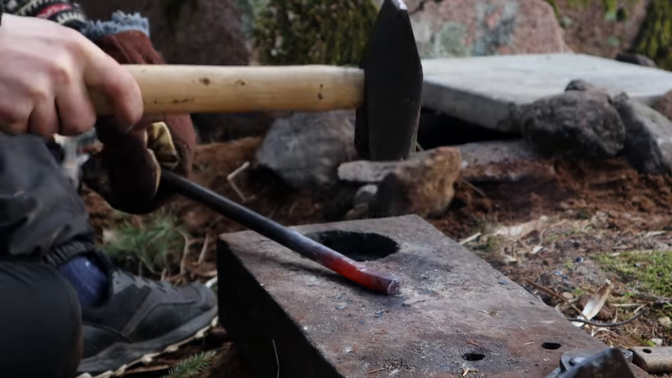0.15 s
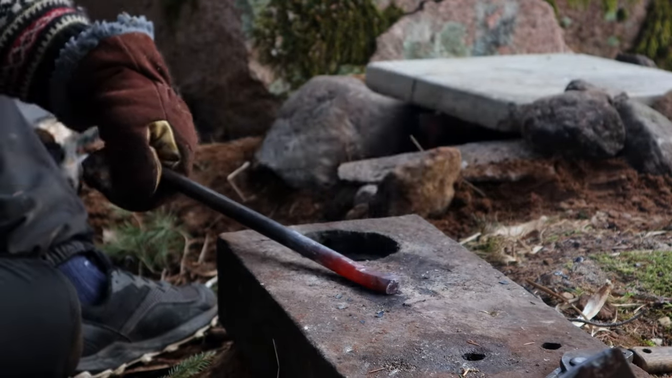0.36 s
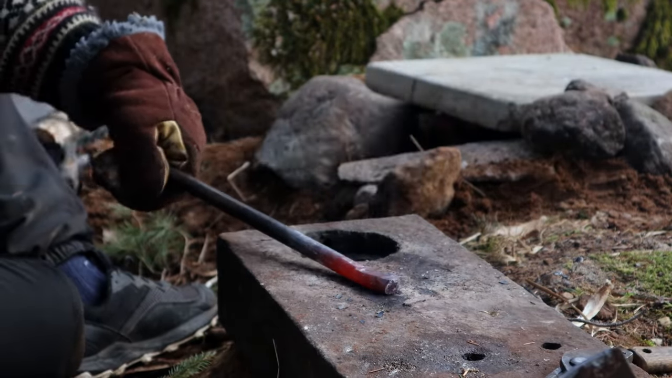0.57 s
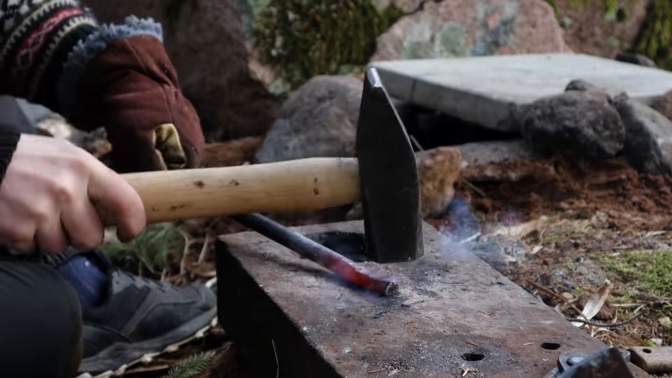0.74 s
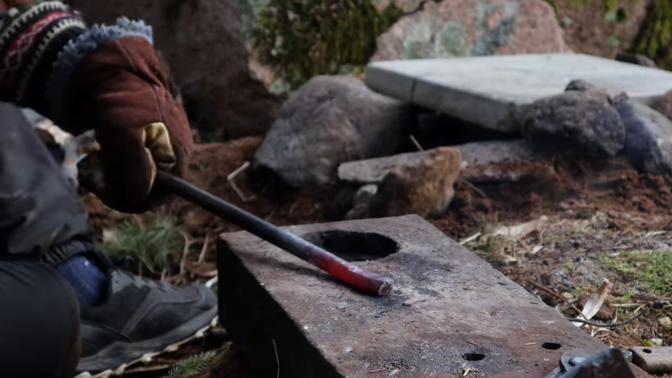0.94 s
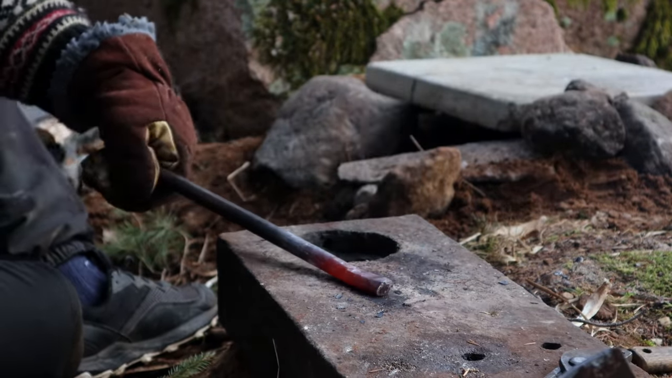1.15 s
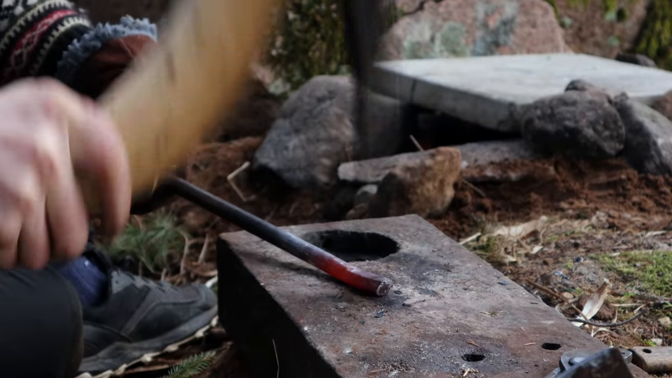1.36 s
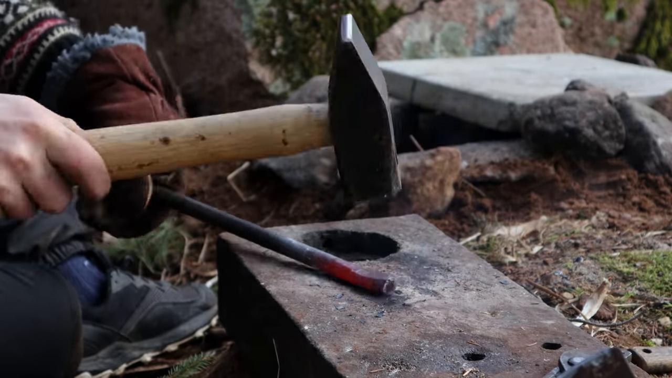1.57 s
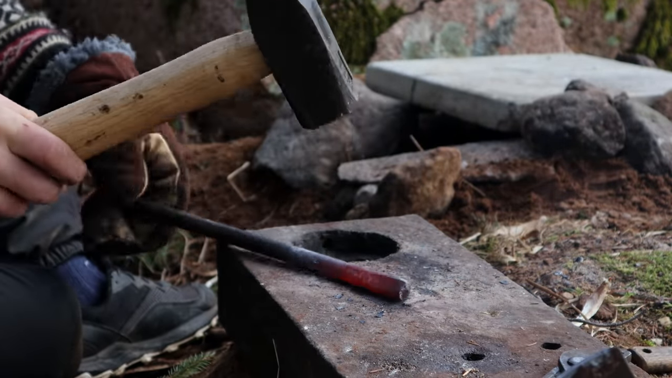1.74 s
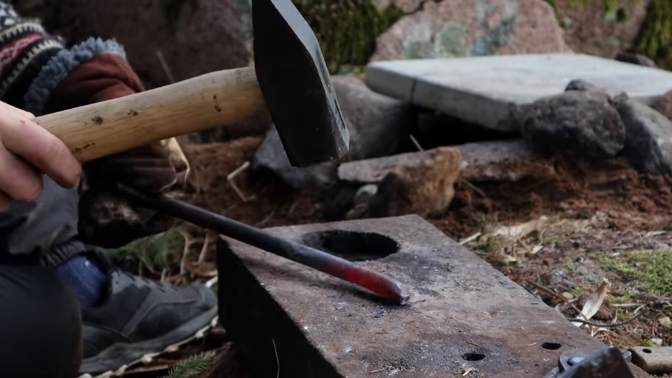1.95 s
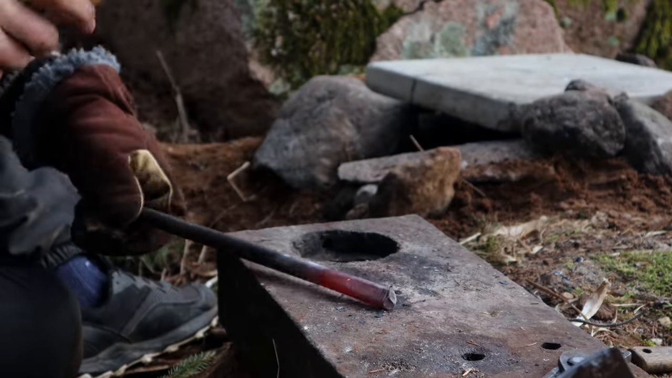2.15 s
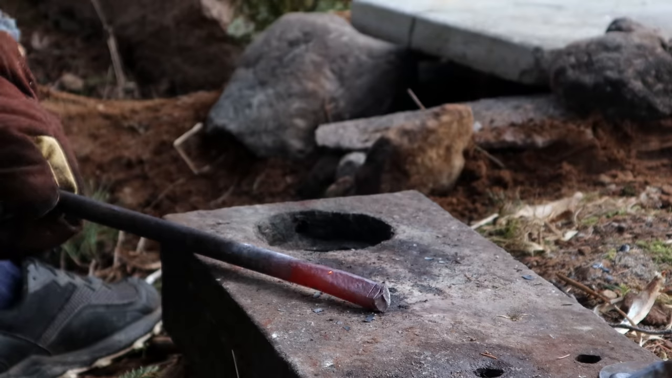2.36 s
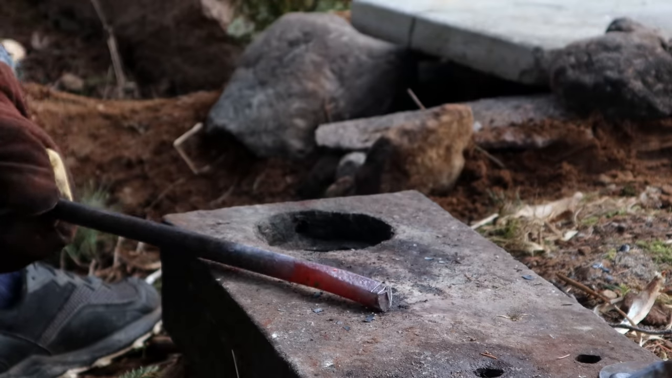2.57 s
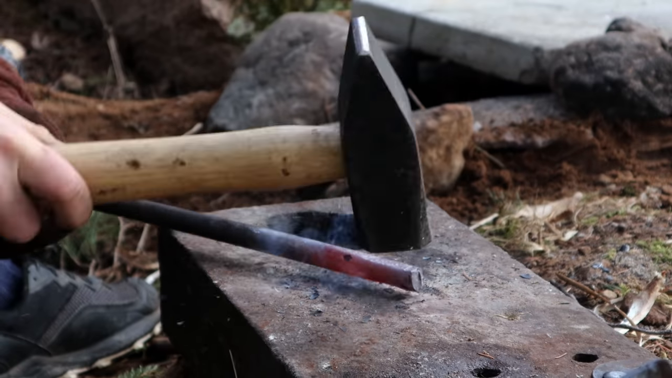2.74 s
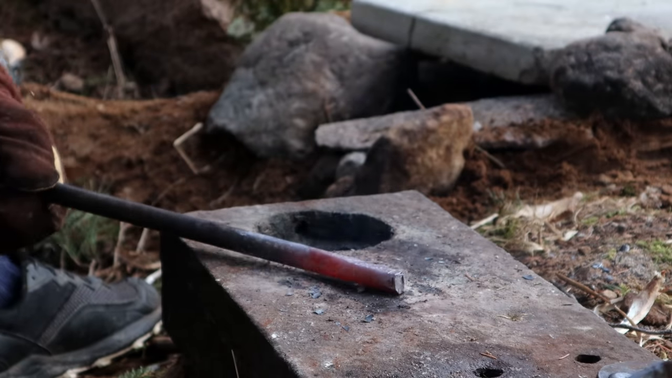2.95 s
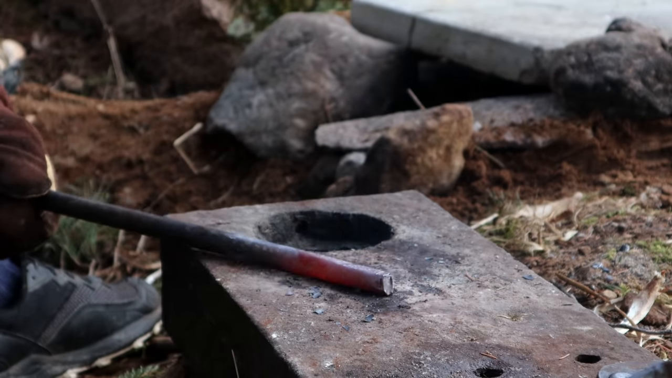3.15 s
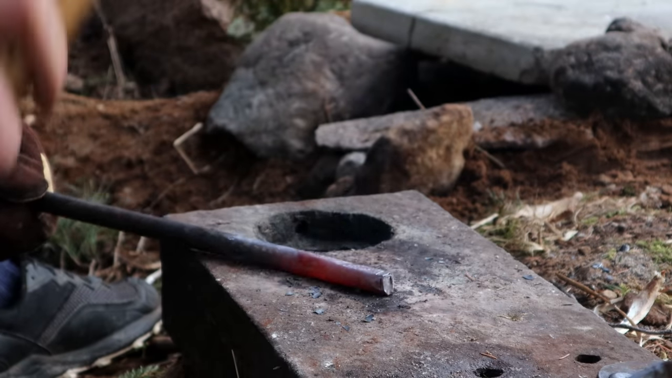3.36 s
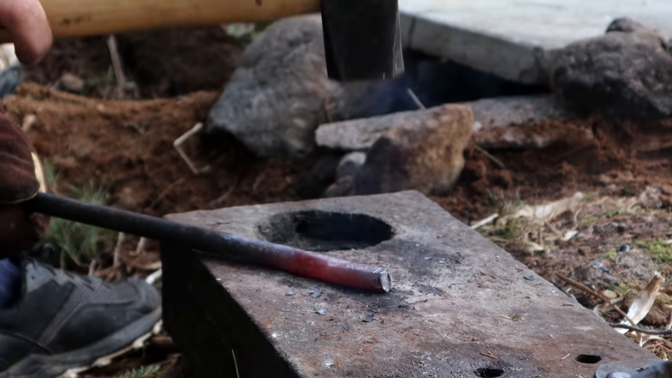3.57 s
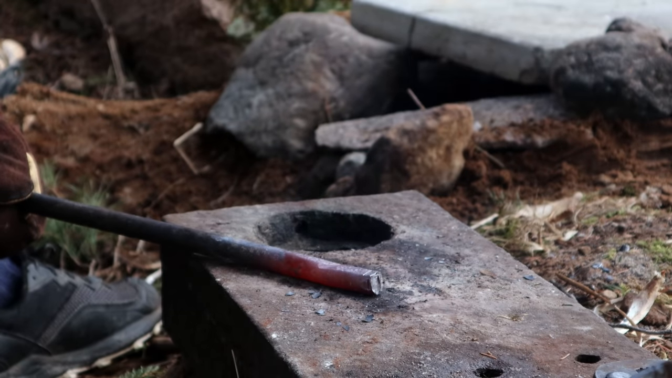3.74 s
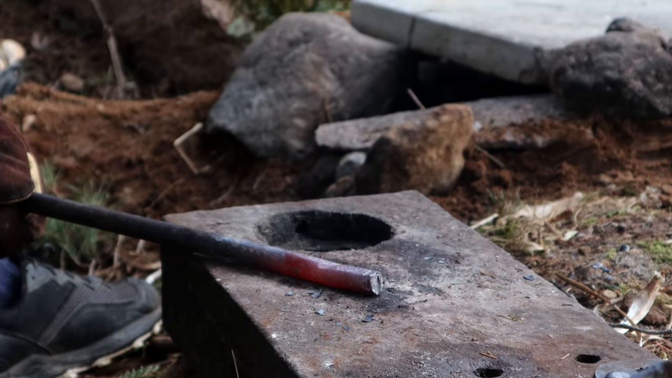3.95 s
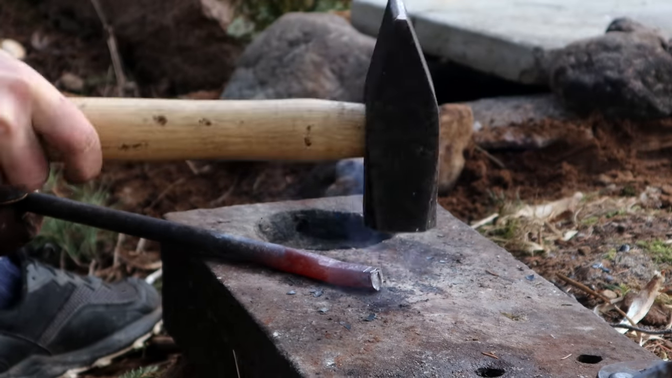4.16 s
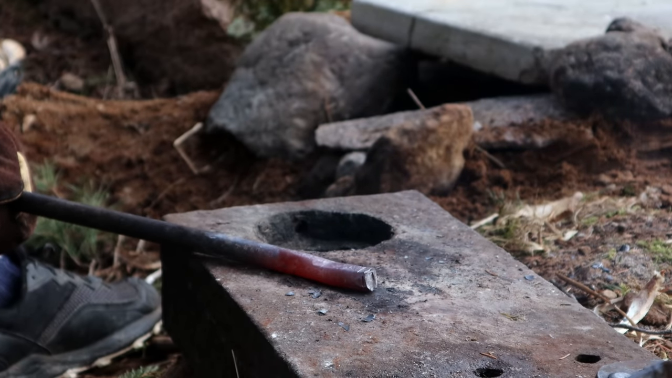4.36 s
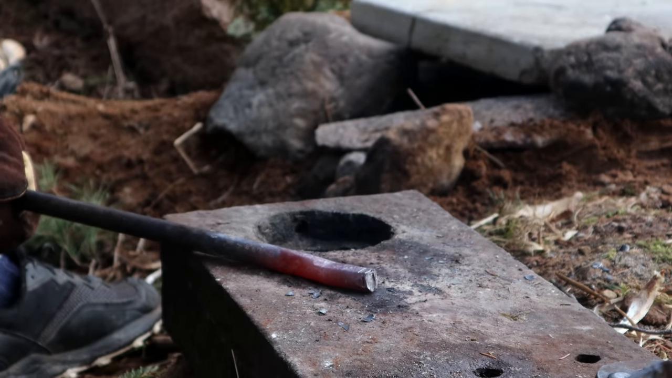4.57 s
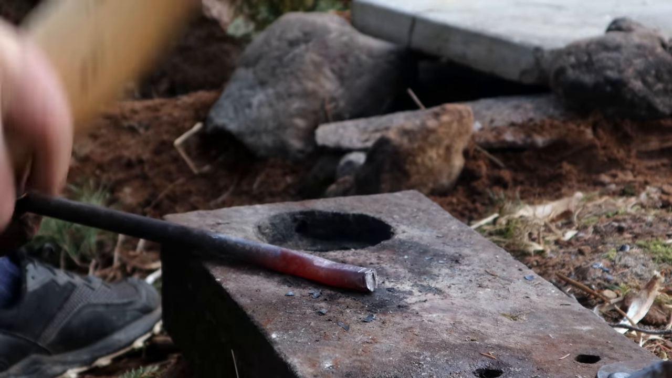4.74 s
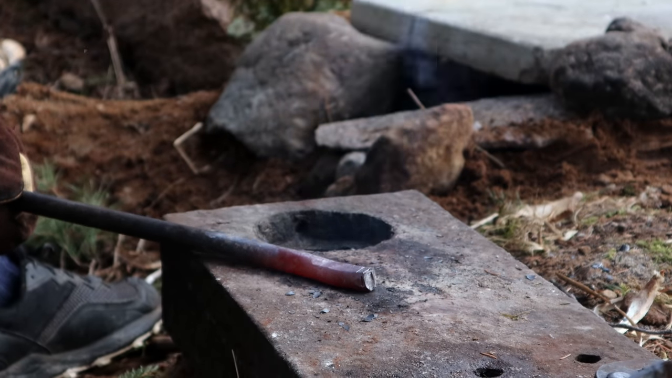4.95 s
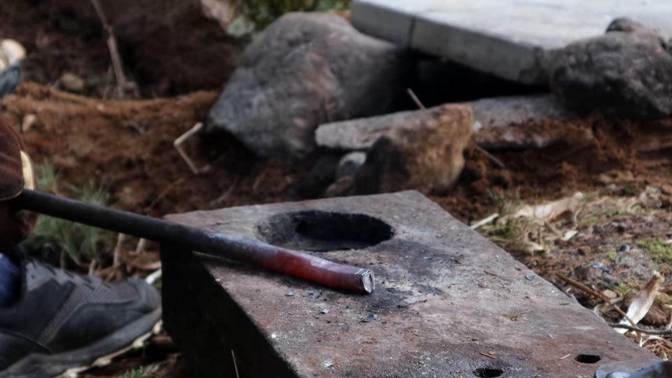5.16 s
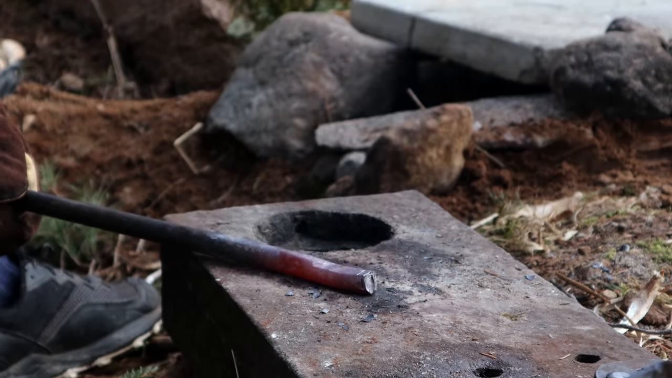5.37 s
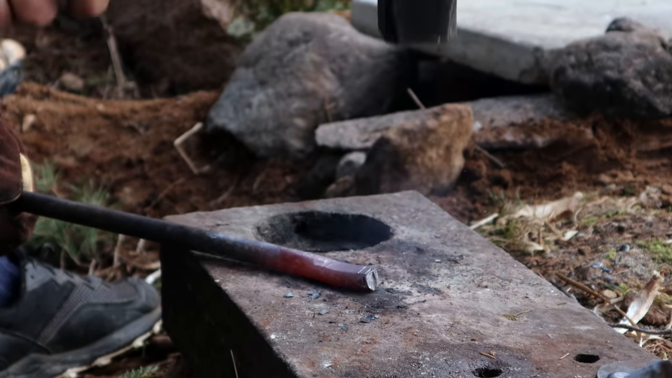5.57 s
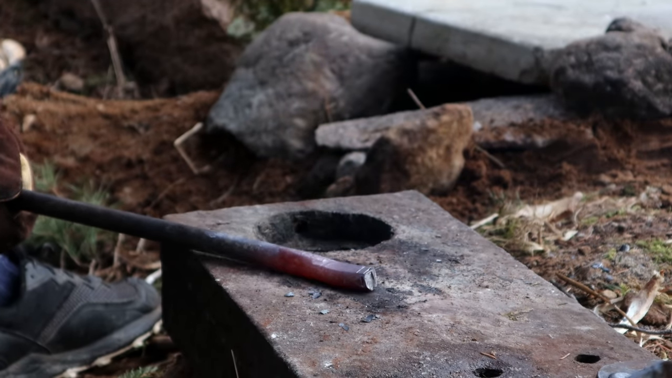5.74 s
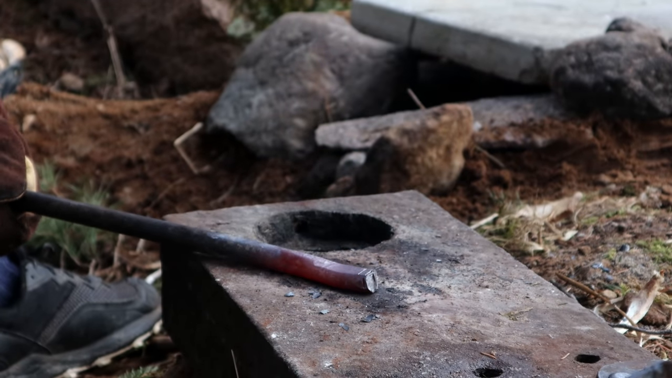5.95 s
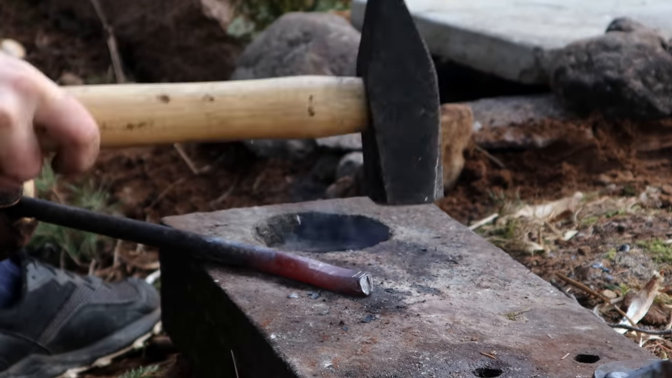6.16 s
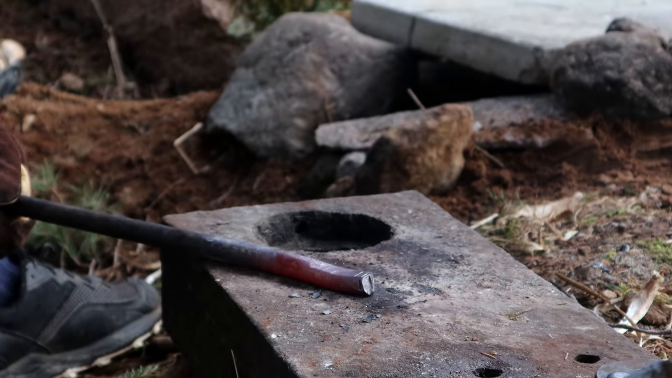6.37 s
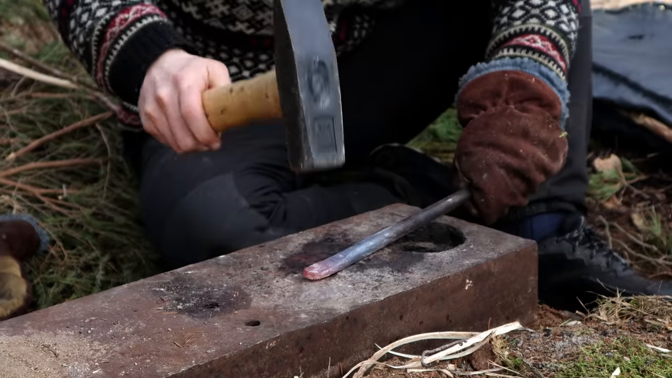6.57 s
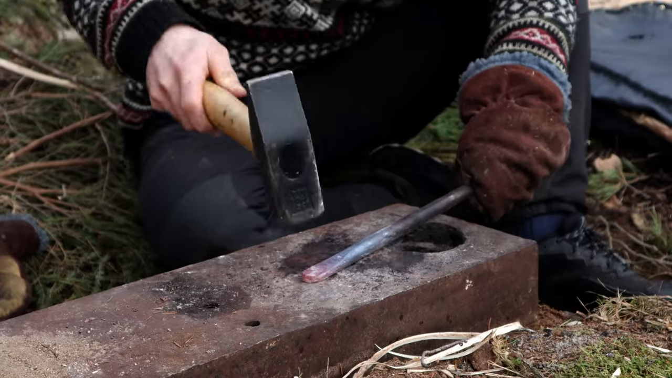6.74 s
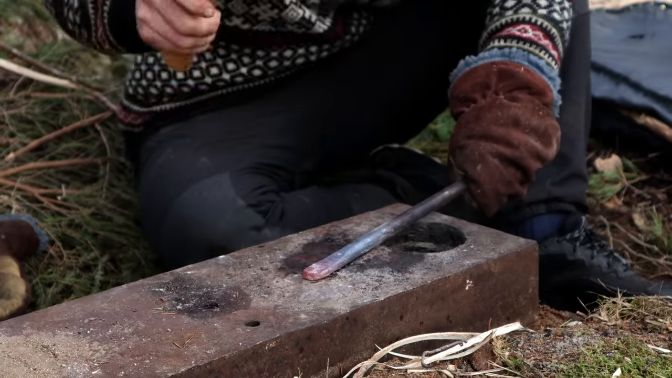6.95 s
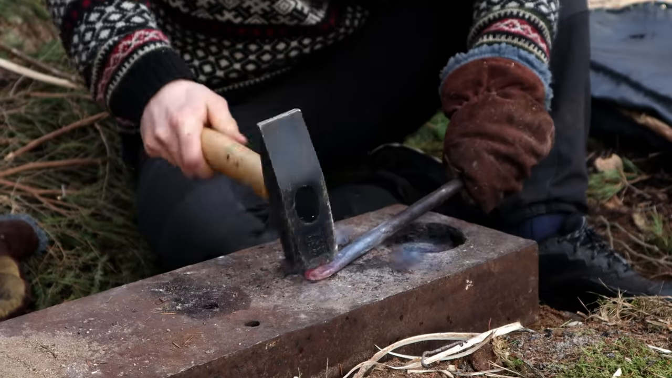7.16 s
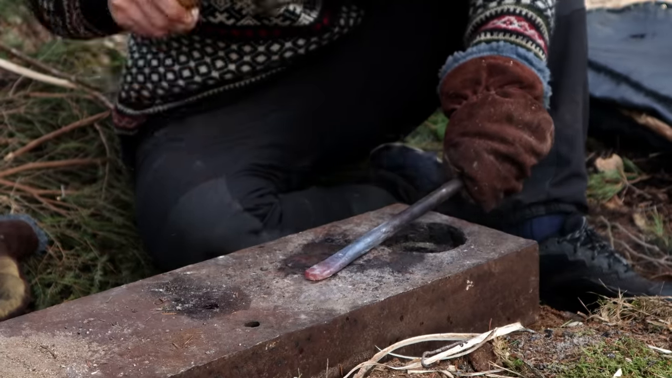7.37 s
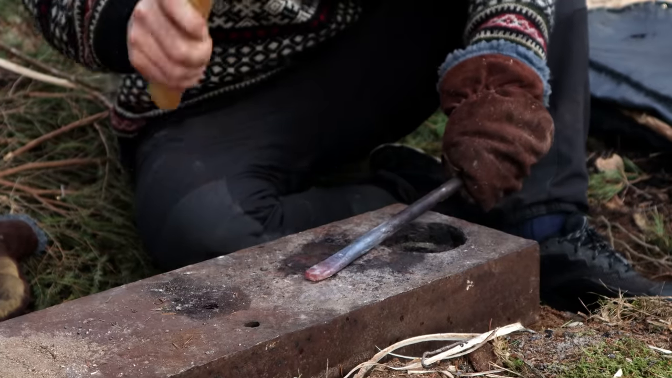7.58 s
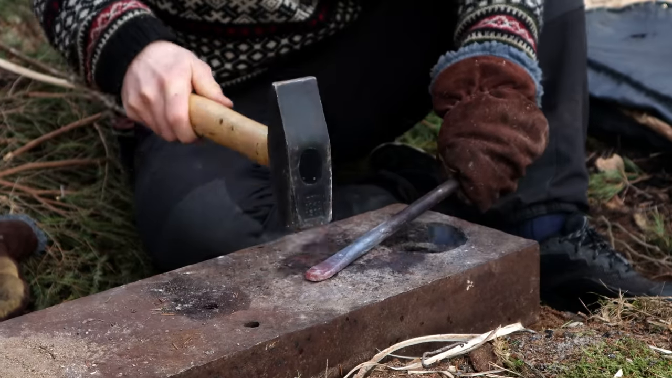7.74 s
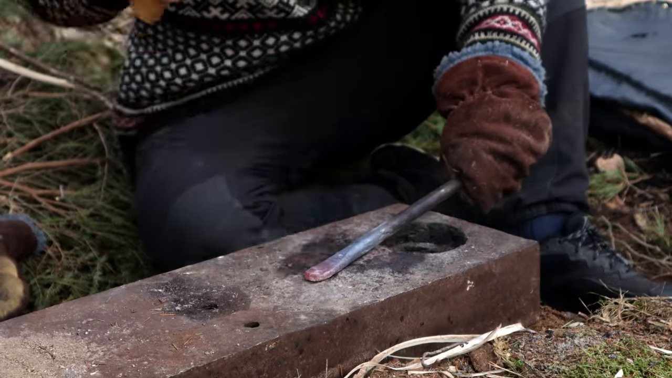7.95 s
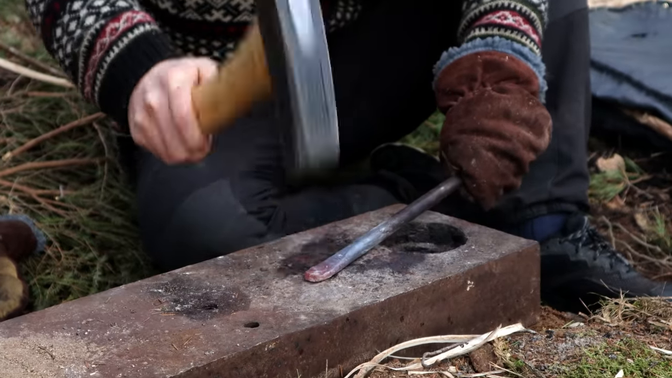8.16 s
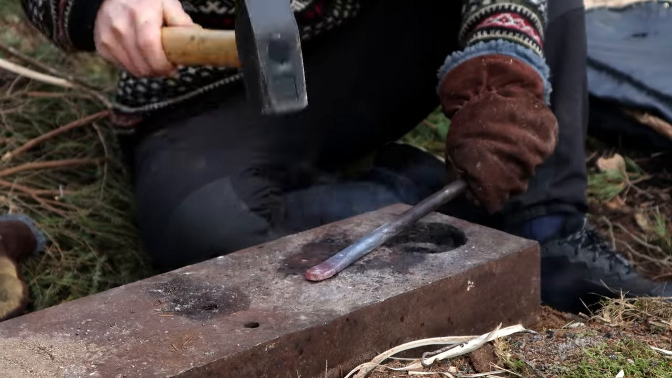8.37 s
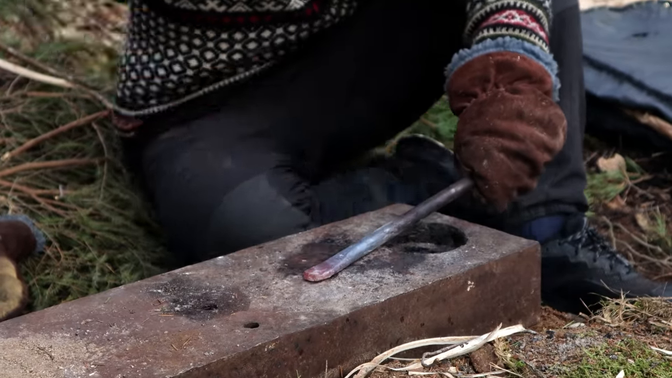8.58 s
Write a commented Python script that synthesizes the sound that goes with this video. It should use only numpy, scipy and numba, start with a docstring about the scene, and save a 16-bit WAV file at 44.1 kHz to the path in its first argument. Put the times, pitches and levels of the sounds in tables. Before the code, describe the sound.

A hand hammer beats a hot steel rod on a steel block, each blow a hard knock with a short, bright ring. Three even strikes are followed by a brief pause with light taps of the rod, then a steady run that quickens near the end. Faint cloth crackles, tiny metal ticks and soft wind lie underneath. The sound is close and outdoors, with a slight echo and a little distortion on each hit.

```python
"""Outdoors, a hand hammer strikes a hot steel rod on a steel block. Each blow knocks dully, pings the
head and rings the block; rocks and trees answer. The rod taps as it bounces or is turned, something small
tinks, cloth crackles and a thin whistle passes, over wind, a drone, a far rush and a rustle.
The start of each blow clips, then the gain control ducks and lets go again."""
import sys
import numpy as np
from scipy import signal
from scipy.fft import rfft, irfft, next_fast_len
from scipy.io import wavfile
from scipy.ndimage import uniform_filter1d, map_coordinates
from numba import njit

SR = 44100
rng = np.random.default_rng(int(sys.argv[2]) if len(sys.argv) > 2 else 0)


def put_to_file(sound):
    """Save the sound as 16-bit audio at rate SR, in the file named by the first command-line argument."""
    columns = np.atleast_2d(sound).T  # one column per channel
    safe = np.clip(columns, -1, 1)
    whole_steps = np.round(safe * 32767)
    wavfile.write(sys.argv[1], SR, whole_steps.astype(np.int16))


N = 379701
STEP_S = 6.525  # the background steps in level and the block's ring cuts off


def amp(db):
    """dB to gain."""
    return 10 ** (np.asarray(db) / 20)


def unit(x):
    """Scale to rms 1."""
    return x / np.sqrt(np.mean(x ** 2) + 1e-20)


def along(points, hz):
    """Interpolate (frequency [Hz], value) points on a log axis."""
    knots_hz, values = np.transpose(points)
    return np.interp(np.log(hz + 1), np.log(knots_hz + 1), values)


def wobble(rate_hz):
    """Smooth random curve, rate_hz knots a second."""
    knots = rng.standard_normal(int(N * rate_hz / SR) + 4)
    return map_coordinates(knots, [np.arange(N) * rate_hz / SR])


def coloured(x, response):
    """Filter x by the gain response(hz)."""
    size = next_fast_len(len(x) + 8192)
    return irfft(rfft(x, size) * response(np.fft.rfftfreq(size, 1 / SR)), size)[:len(x)]


def noise(response, size):
    """Filtered noise, rms 1."""
    return unit(coloured(rng.standard_normal(size), response))


def hiss(spectrum, size):
    """Noise shaped by (frequency [Hz], density [dB]) points."""
    return noise(lambda hz: amp(along(spectrum, hz)), size)


def band_noise(centre_hz, log_width, size):
    """Noise in a Gaussian band on a natural-log frequency axis."""
    return noise(lambda hz: np.exp(-(np.log((hz + 1) / centre_hz) / log_width) ** 2), size)


def flutter(width_hz, size):
    """Low-pass noise for modulation."""
    return noise(lambda hz: np.exp(-(hz / width_hz) ** 2), size)


def ring(modes, t, scatter_db):
    """Damped sines, each at a randomly scattered level."""
    return sum(amp(db + scatter_db * rng.standard_normal() - 60 * t / t60_s) * np.sin(2 * np.pi * hz * t)
               for hz, db, t60_s in modes)


def add(track, start_s, sound):
    """Mix a sound in at start_s."""
    part = track[round(start_s * SR):][:len(sound)]
    part += sound[:len(part)]


def yard(x, wet_db):
    """Add a diffuse echo from rocks and trees; its decay depends on frequency."""
    decay = [(200, 0.15), (2000, 0.59), (6000, 0.49), (15000, 0.33)]  # echo: (frequency [Hz], t60 [s])
    hz, t, bins = signal.stft(rng.standard_normal(len(x)), SR, nperseg=256)
    tail = signal.istft(bins * amp(-60 * t / along(decay, hz)[:, None]), SR, nperseg=256)[1]
    return x + amp(wet_db) * signal.fftconvolve(x, tail / np.linalg.norm(tail))[:len(x)]


def air():
    """Wind hits the microphone in lumps; drone and far rush drift; the rustle flickers."""
    gusts = [(0.0, -60), (0.43, -62), (0.91, -59.5), (1.15, -62.5), (3.64, -62.5), (3.88, -64.5),
             (4.44, -52.5), (5.08, -47.5), (5.73, -50.5), (5.83, -53), (8.39, -57), (8.61, -58)]  # wind: (time [s], level [dB])
    # noise spectra: (frequency [Hz], density [dB])
    wind = [(15, -8), (40, -3), (100, -5), (200, -17.5), (400, -56.5)]
    drone = [(60, -29), (120, -2), (250, -5.5), (450, -7.5), (650, -15.5), (1000, -58)]
    rush = [(300, -20.5), (550, 2.5), (900, 4), (1500, -1), (2500, -7), (4000, -16.5), (6000, -61.5)]
    rustle = [(2500, -39.5), (4000, 5.5), (6000, -1), (8500, 0.5), (10000, -8), (14000, -2.5),
              (15900, -7.5), (16300, -28.5)]
    t = np.arange(N) / SR
    wind_db = np.interp(t, *np.transpose(gusts))
    drone_db = np.where(t > STEP_S, -48, -58)
    rush_db = np.where(t > STEP_S, -58.5, -54.5)
    return (amp(wind_db + 2.5 * wobble(14) + 2.1 * wobble(2.5)) * hiss(wind, N)
            + amp(drone_db + 0.71 * wobble(24) + 0.82 * wobble(4.6)) * hiss(drone, N)
            + amp(rush_db + 0.42 * wobble(15)) * hiss(rush, N)
            + amp(-67 + 1.3 * wobble(20) + 0.89 * wobble(3)) * hiss(rustle, N))


def whistle():
    """A thin gliding tone, made fuzzy by random flutter."""
    glides = [
        [(3.0, 6500, -56), (3.1, 6600, -67), (3.15, 6800, -60), (3.16, 9100, -65), (3.212, 7900, -62),
         (3.222, 7250, -59), (3.245, 7100, -67)],
        [(3.28, 6340, -57), (3.325, 5700, -60), (3.42, 5550, -61), (3.53, 5540, -59)],
        [(7.74, 7200, -62), (7.765, 7800, -70)],
    ]  # one list a glide: (time [s], frequency [Hz], level [dB])
    out = np.zeros(N)
    for glide in glides:
        times_s, hz, db = np.transpose(glide)
        t = np.arange(times_s[0], times_s[-1], 1 / SR)
        fuzz = 0.083 + flutter(width_hz=330, size=len(t))
        tone = np.sin(2 * np.pi * np.cumsum(np.interp(t, times_s, hz)) / SR)
        envelope = amp(np.interp(t, times_s, db)) * signal.windows.tukey(len(t), 0.1)
        add(out, times_s[0], envelope * fuzz * tone)
    return out


def cloth():
    """Cloth crackles in short noise snaps, some placed, faint ones at random, and rubs in swells."""
    snaps = [(.358, -51, 9900), (.5, -57, 10000), (.506, -52, 8560), (.606, -48, 2520), (.666, -50.5, 8970),
             (.682, -44.5, 2495), (.7, -53, 9000), (.735, -58, 7040), (1.235, -55, 2800),
             (1.247, -51, 2800), (1.263, -54, 2960), (1.279, -43, 2740), (1.295, -48, 2800),
             (1.337, -46, 2800), (1.477, -48, 3000), (1.705, -44, 5000), (2.178, -54, 8430),
             (3.291, -60, 3000), (3.34, -48, 2400), (3.364, -64, 3020), (3.395, -48, 2800),
             (3.41, -58, 3000), (3.781, -50, 2300), (3.801, -51, 2250), (4.479, -47, 2500),
             (4.687, -52, 2660), (5.525, -58.5, 2500), (7.01, -51.5, 4470), (7.024, -56, 3960),
             (7.595, -54, 2960), (7.686, -51.5, 3280), (8.179, -47.5, 5970)]  # crackles: (time [s], level [dB], centre [Hz])
    rubs = [(.365, 0.031, -54, 9000), (0.416, 0.35, -66, 12000), (1.616, 0.26, -54, 2444),
            (1.836, 0.09, -67, 9000), (2.26, 0.17, -60, 7300), (2.447, 0.43, -64, 5350),
            (6.512, 0.11, -53.5, 2770), (6.84, 0.34, -66, 12000), (8.477, 0.25, -49.5, 3240)]  # rubs: (time [s], length [s], level [dB], centre [Hz])
    out, t = np.zeros(N), np.arange(SR // 30) / SR
    when, strength, pitch = rng.random((60, 3)).T
    faint = zip(when * N / SR, -68 + 7 * strength, 2500 * 5 ** pitch)
    for start_s, db, centre_hz in [*snaps, *faint]:
        fade = amp(db - 60 * t / 0.016)
        add(out, start_s, fade * band_noise(centre_hz, log_width=0.35, size=len(t)))
    for start_s, length_s, db, centre_hz in rubs:
        size = int(length_s * SR)
        swell = signal.windows.tukey(size, 0.6) * amp(1.5 * wobble(58)[:size])
        add(out, start_s, amp(db) * swell * band_noise(centre_hz, log_width=0.88, size=size))
    return out


def tinks():
    """Tiny metallic ticks: a click and a high ring."""
    ticks = [(3.408, -50), (6.918, -34), (7.011, -54.5), (7.3861, -46), (7.4991, -53), (7.519, -48),
             (7.544, -48), (7.624, -53), (7.674, -50), (7.94, -57), (8.0143, -48), (8.0396, -47),
             (8.0587, -46), (8.1753, -45), (8.5945, -44)]  # (time [s], level [dB])
    modes = [(9750, -12, .03), (10830, -13, 0.04), (11000, -10, 0.055)]  # small metal: (frequency [Hz], level [dB], t60 [s])
    out, t = np.zeros(N), np.arange(SR // 8) / SR
    for start_s, db in ticks:
        click = amp(-14 - 60 * t / 0.005) * rng.standard_normal(len(t))
        add(out, start_s, amp(db) * (ring(modes, t, scatter_db=2) + click))
    return out


def rod():
    """The rod chatters on the block, so its ring is rough; the grip mutes its modes more or less."""
    # rod on block: (time [s], low mode [dB], upper modes [dB], click [dB], t60 factor)
    taps = [(1.771, -32, -48.5, -52, 1.4), (1.788, -39, -70, -56, 3.6), (1.833, -46, -64, -58, 1.2),
            (1.841, -44, -54, -47, 1.1), (2.237, -38, -55, -48, 0.73), (2.9001, -18, -24.5, -30, 0.24),
            (2.919, -25, -50, -36, 0.15), (6.275, -32, -40, -14, .3), (6.651, -67, -63.5, -45, 0.47),
            (6.7863, -25.5, -29.5, -15.5, 0.28), (6.845, -40.5, -66, -53, 0.83),
            (7.278, -64, -32.5, -20, .2), (7.359, -36, -54, -53, 0.55)]
    free_modes = [(980, 6.5, 0.054), (1445, 4, 0.21), (2710, 12.5, 0.089), (4440, 6.5, 0.056)]  # rod: (frequency [Hz], level [dB], t60 [s])
    out, t = np.zeros(N), np.arange(SR // 5) / SR
    rise = 1 - np.exp(-t / 0.00027)
    for start_s, low_db, upper_db, click_db, t60_factor in taps:
        chatter = 1 + 0.65 * flutter(width_hz=150, size=len(t))
        modes = [(hz, db, t60_s * t60_factor) for hz, db, t60_s in free_modes]
        low = amp(low_db) * ring(modes[:1], t, scatter_db=0)
        upper = amp(upper_db) * ring(modes[1:], t, scatter_db=2)
        click = amp(click_db - 60 * t / 0.02) * band_noise(centre_hz=2200, log_width=0.85, size=len(t))
        add(out, start_s, rise * (chatter * (low + upper) + click))
    return out


def block(t, t60_factor, landing_s, controls):
    """The steel block rings in mode families; the rod damps them on landing again."""
    families = [
        [(969, 0, .152)],
        [(1550, 0, .26), (1846, -14, .3)],
        [(2330, 0, .18), (3160, -19, .15)],
        [(3637, 0, .4), (13240, -15, .24)],
        [(2871, -12, .22), (3925, 0, .2), (3969, -2, .19), (4217, -19, .2)],
        [(5615, -10, .22), (5714, 0, .15), (5997, -10, .13), (6487, -2, .15), (6892, -3, .14), (7224, -8, .1),
         (7815, -6, .14), (8638, -8, .12), (9421, -16, .11), (10250, -16, .11), (10950, -14, .13),
         (11510, -12, .16), (11850, -16, .11), (12600, -17, .1)],
    ]  # modes, one list a family: (frequency [Hz], level [dB], free t60 [s])
    # per family: (usual level [dB], loss under the rod [dB/s],
    #   then gain per unit of glancing, spot along block, tone colour 1, tone colour 2 [dB])
    responses = [(-3.5, 360, -23.5, 6, -2.9, 0.5), (-14.0, 282, -13, 0.9, 3, 5.1),
                 (-9.5, 328.5, -37, 3, -1.2, 0.85), (-26, 48, -8.5, -2.1, 10, -4),
                 (-22, 93, -17, -24, 1, 3.8), (-27, 45.0, 1.4, 1.7, 2.2, 4)]
    steel = 0
    for family, (usual_db, loss_db_per_s, *control_db) in zip(families, responses):
        modes = [(hz, db, t60_s * t60_factor) for hz, db, t60_s in family]
        level_db = usual_db + np.dot(control_db, controls) - loss_db_per_s * np.maximum(t - landing_s, 0)
        steel += amp(level_db) * ring(modes, t, scatter_db=0.7 + len(modes) / 4)
    return steel


def hammer():
    """Each blow: block ring, thud, knock, handle jar, a crack with a rattle of scale, head pings."""
    # (time [s], block t60 factor, rod lands after [s], thud [dB], knock [dB], jar [dB], 3 pings [dB],
    #   then controls [-1..1, 0 = usual]: glancing, spot along block, tone colour 1, tone colour 2)
    # colour 1: more 3637 Hz ring; colour 2: more 1550 Hz and treble ring against 3637 Hz
    blows = [(0.1389, 1.5, 0.076, -4, 15, -8.5, -20, -13.5, -45.5, -0.16, -0.088, 0.19, -1.0),
             (0.8245, 1.44, 0.071, -7.5, 12.0, -20.5, -21, 1.5, -44, -0.06, -0.14, -1.0, -0.22),
             (1.5167, 1.44, 0.11, -12, 13.5, -15.5, -24, -13.5, -28.5, -0.2, -0.45, 0.39, -0.54),
             (2.842, 1.88, 0.076, -19, 6, -3.5, -36, -28.5, -19.5, 0.72, -0.36, -0.44, 0.32),
             (3.53, 1.15, 0.14, -6.5, 9.5, -0.5, -33.5, -13.5, -43, 0.13, -0.29, -0.65, -0.4),
             (4.2094, 1.47, 0.11, -3, 12, -8, -24, 0.5, -40, 0.03, -0.27, -0.068, -0.035),
             (4.8968, 1.5, 0.11, -10, 13, -19, -40.5, -7, -31, -0.03, -0.45, -0.49, 0.17),
             (5.559, 1.5, 0.11, -6, 12, -13.5, -19.5, -4, -46, -0.26, -0.53, 0.52, 0.19),
             (6.236, 1.45, 0.11, -9, 14.5, -4.5, -22.5, -20, -39.5, -0.17, -0.49, -0.17, -0.019),
             (6.762, 0.73, 0.059, -9.5, -1.5, 0, -30.5, -30.5, -7.5, 1.0, 0.19, 0.54, -0.2),
             (7.261, 0.93, 0.045, -4, 14, 1.5, -24, -31, 1.5, 0.016, 0.84, 0.03, -0.93),
             (7.782, 0.89, 0.057, -4.5, 14, 0, -28.0, -33.5, -22, -0.055, 0.97, 0.26, 0.7),
             (8.3181, 0.89, 0.058, -8, 13.5, -3, -13.5, -30.5, -22.5, -0.23, 0.45, 0.44, 0.48)]
    # modes: (frequency [Hz], level [dB], t60 [s])
    thud_modes = [(454, -7.5, 0.051), (525, -5.5, 0.078)]  # block's dull low modes
    knock_modes = [(1125.4, -3, 0.032)]  # hammer on soft rod
    handle_modes = [(297, -12.5, 0.035), (592, -0.5, 0.024), (703, -1.5, 0.023)]  # wooden handle
    soil_modes = [(45, -14.5, 0.04)]  # block pushing into soil
    head_pings = [
        [(10049, 5, .11)],
        [(13575, 3, .045)],
        [(8471, 4, .035)],
    ]  # hammer head, one list a ping
    crack_spectrum = [(30, -26), (200, -14), (600, -14), (2300, -4.5), (4200, -11), (8500, -15.5),
                      (12000, -19.5), (15500, -20.5), (16500, -41.5)]  # impact noise: (frequency [Hz], density [dB])
    out, t = np.zeros(N), np.arange(SR // 2) / SR
    rise = 1 - np.exp(-t / 0.0014)
    for start_s, t60_factor, landing_s, thud_db, knock_db, jar_db, *rest in blows:
        pings_db, controls = rest[:3], rest[3:]
        glancing = controls[0]
        steel = block(t, t60_factor, landing_s, controls)
        thud = amp(thud_db) * ring(thud_modes, t, scatter_db=1.5)
        knock = amp(knock_db) * ring(knock_modes, t, scatter_db=1.5)
        jar = amp(jar_db) * ring(handle_modes, t, scatter_db=1.5)
        fade = amp(-60 * t / 0.016) + amp(-25.5 - 60 * t / 0.12)  # sharp crack, slower rattle
        crack = amp(9 - 6.5 * glancing) * fade * hiss(crack_spectrum, len(t))
        gate = (start_s > STEP_S) | (start_s + t < STEP_S)
        add(out, start_s, gate * yard(rise * steel, wet_db=-26.5))
        push = amp(-10.5 * glancing) * ring(soil_modes, t, scatter_db=1)
        add(out, start_s, yard(rise * (thud + knock + jar + crack), wet_db=-26.5) + push)
        pings = sum(amp(db) * ring(modes, t, scatter_db=1) for db, modes in zip(pings_db, head_pings))
        add(out, start_s, rise * pings)
    return out


def scene():
    """All sources at one microphone."""
    return (hammer() + rod() + tinks() + cloth() + whistle() + air())[None]


@njit
def duck(need_db, attack_s, hold_s, release_db_per_s):
    """Gain [dB] sinks towards the need, holds, then climbs back at a steady rate."""
    out, gain_db, wait = np.empty_like(need_db), 0.0, 0.0
    for i in range(len(need_db)):
        if need_db[i] < gain_db:
            gain_db += (need_db[i] - gain_db) / (attack_s * SR)
            wait = hold_s * SR
        elif wait > 0:
            wait -= 1
        else:
            gain_db = min(need_db[i], gain_db + release_db_per_s / SR)
        out[i] = gain_db
    return out


def record(dry):
    """Gain control too slow for the attack, so the first cycles clip; then a band limit."""
    threshold_db, ceiling, top_hz = -11.5, 0.47, 17140
    level_db = 10 * np.log10(np.abs(uniform_filter1d(dry[0] ** 2, size=256)) + 1e-12)
    need_db = -0.9 * np.maximum(level_db - threshold_db, 0)
    ducked = dry[0] * amp(duck(need_db, attack_s=0.015, hold_s=0.023, release_db_per_s=600))
    clipped = ducked / (1 + np.abs(ducked / ceiling) ** 6) ** (1 / 6)
    return coloured(clipped, lambda hz: (hz < top_hz) * amp(-22 * np.clip((hz - 15600) / 900, 0, 1)))[None]


dry = scene()
out = record(dry)
put_to_file(out)
```